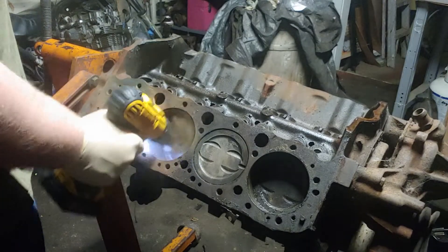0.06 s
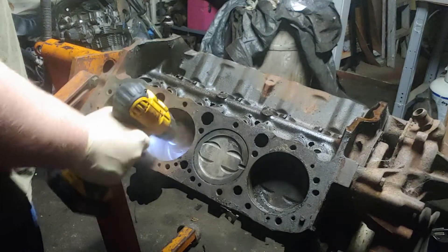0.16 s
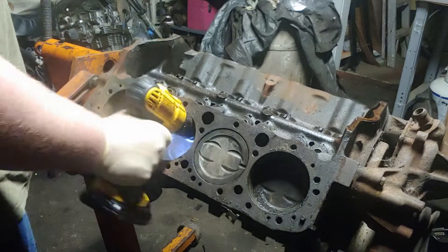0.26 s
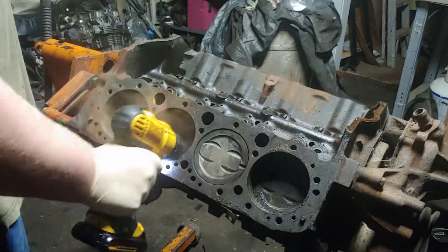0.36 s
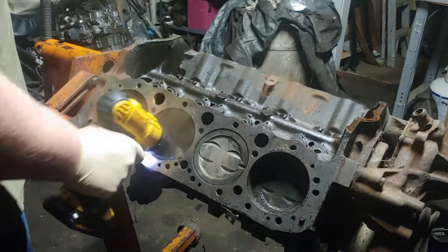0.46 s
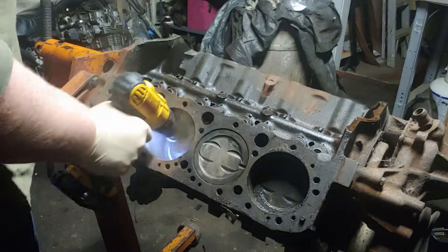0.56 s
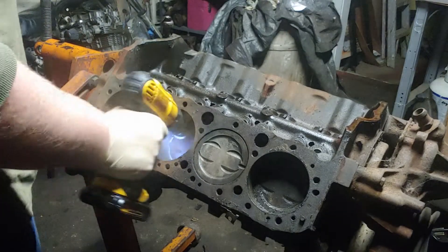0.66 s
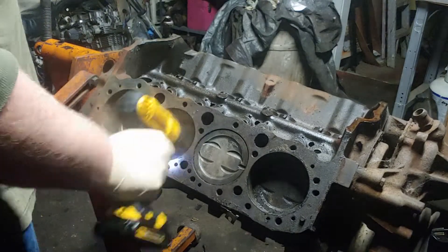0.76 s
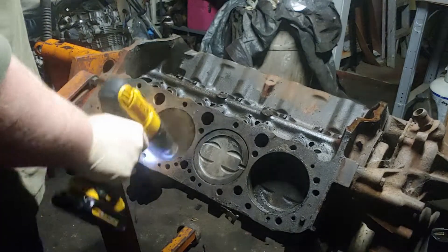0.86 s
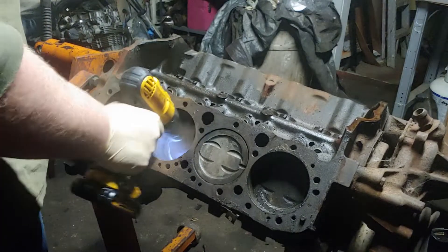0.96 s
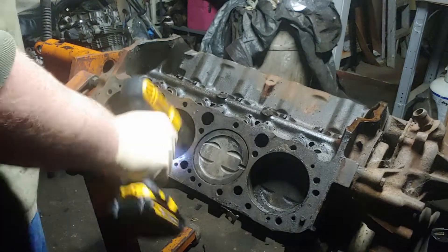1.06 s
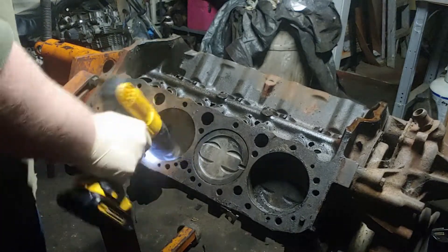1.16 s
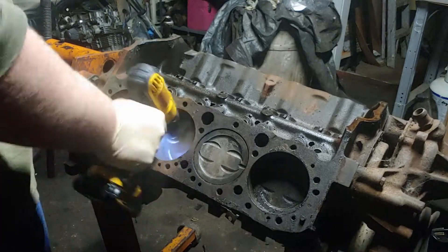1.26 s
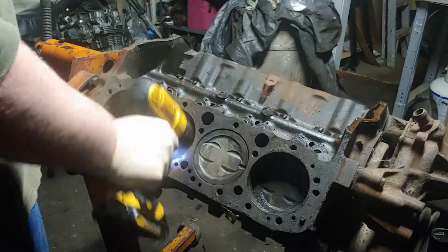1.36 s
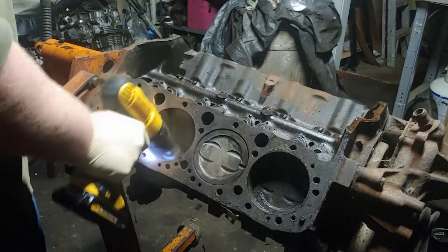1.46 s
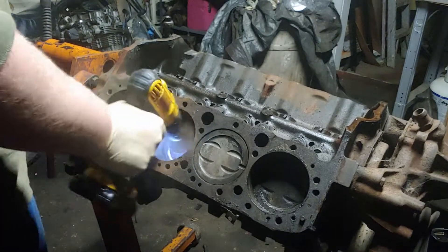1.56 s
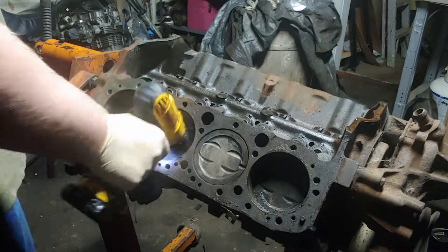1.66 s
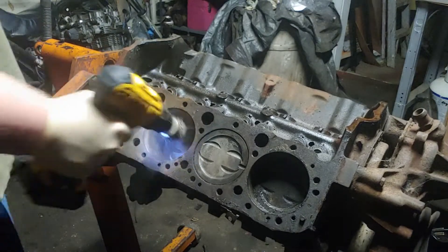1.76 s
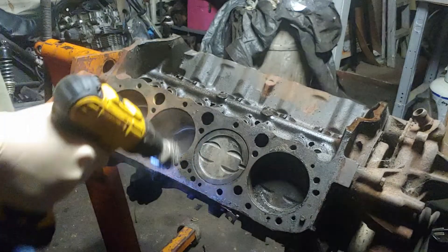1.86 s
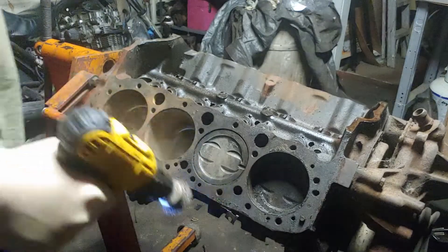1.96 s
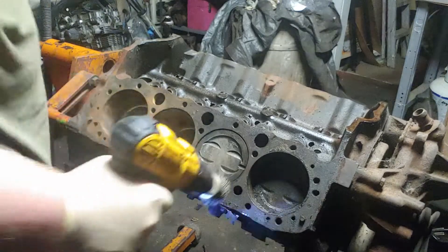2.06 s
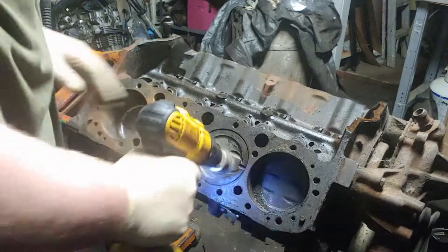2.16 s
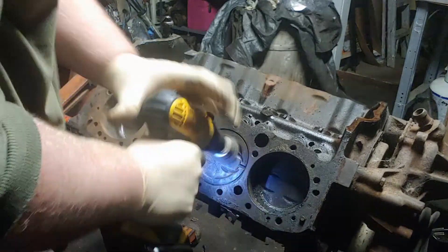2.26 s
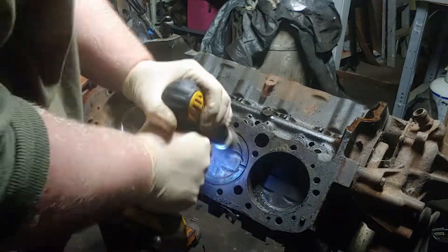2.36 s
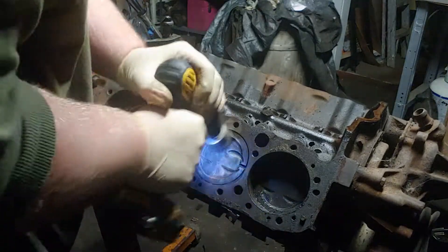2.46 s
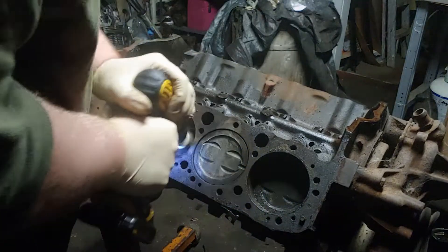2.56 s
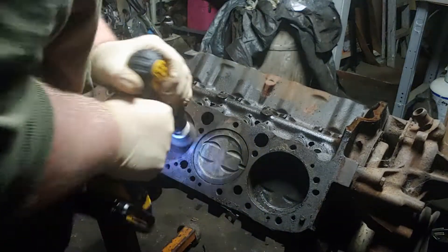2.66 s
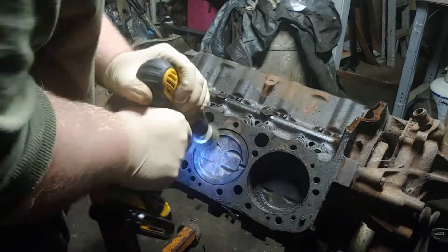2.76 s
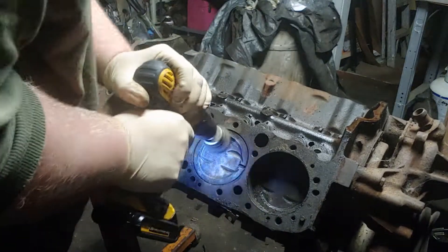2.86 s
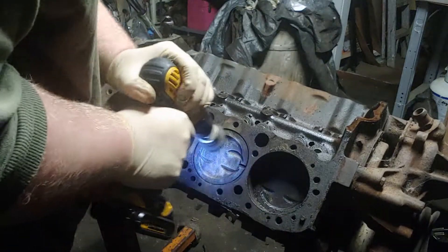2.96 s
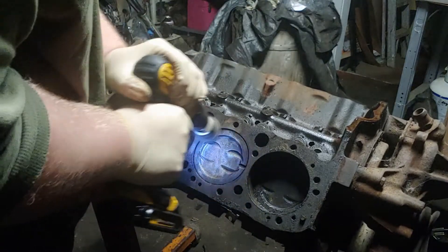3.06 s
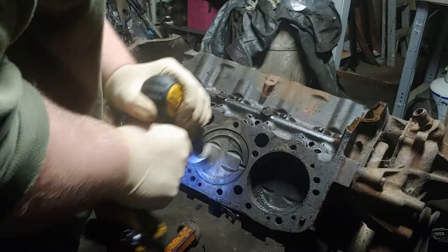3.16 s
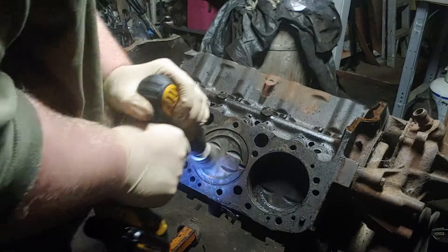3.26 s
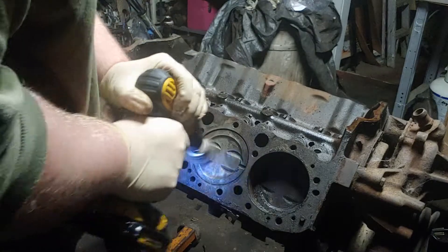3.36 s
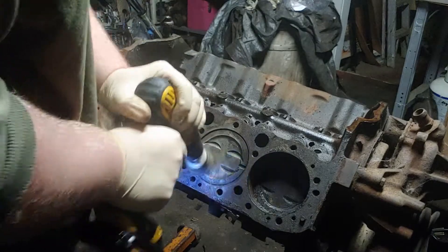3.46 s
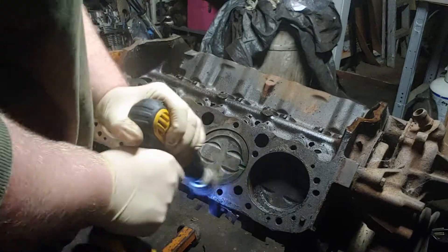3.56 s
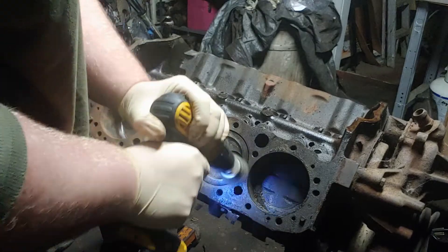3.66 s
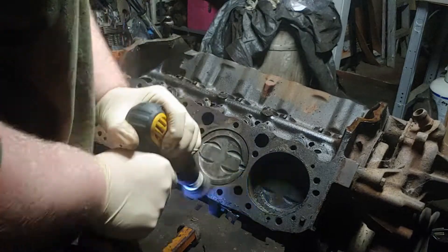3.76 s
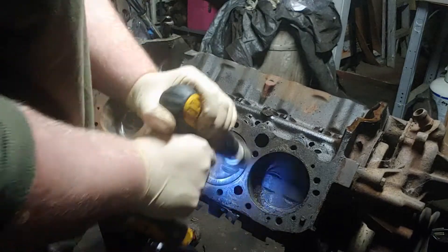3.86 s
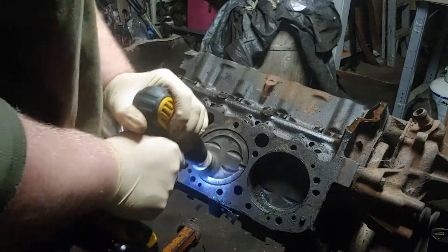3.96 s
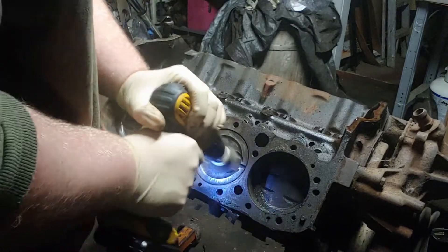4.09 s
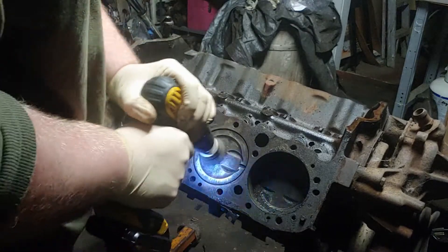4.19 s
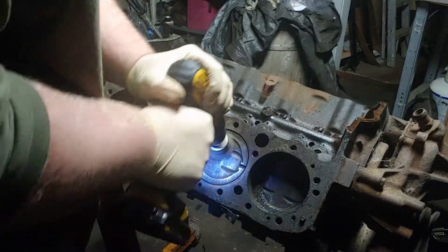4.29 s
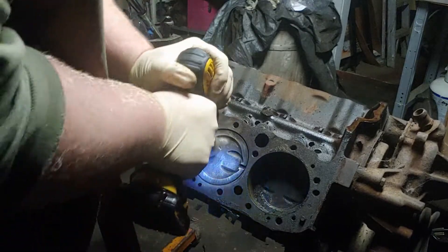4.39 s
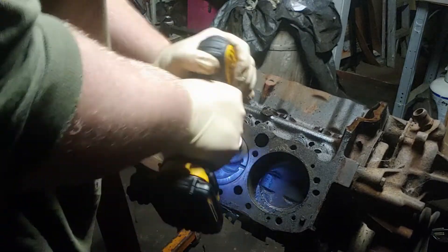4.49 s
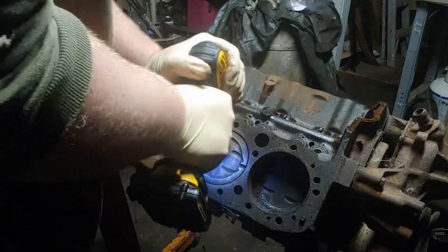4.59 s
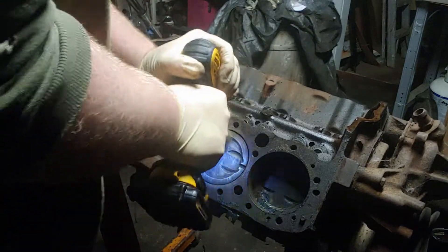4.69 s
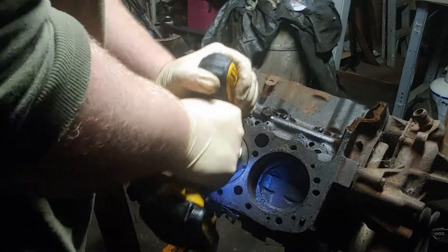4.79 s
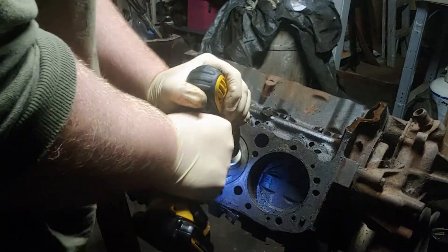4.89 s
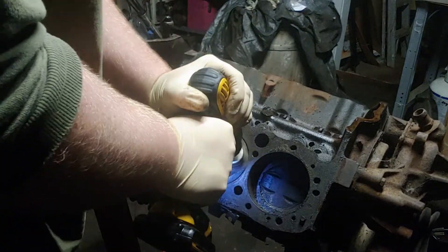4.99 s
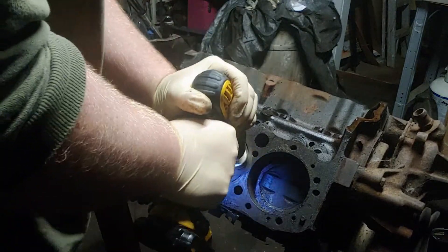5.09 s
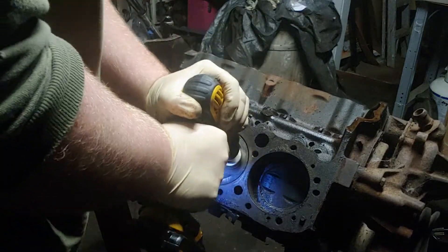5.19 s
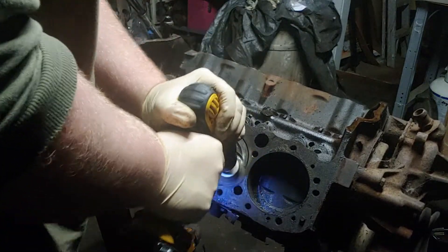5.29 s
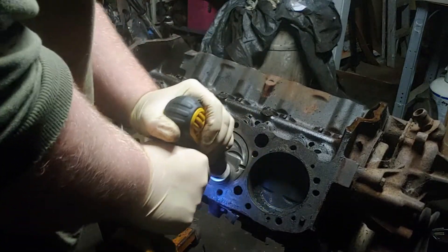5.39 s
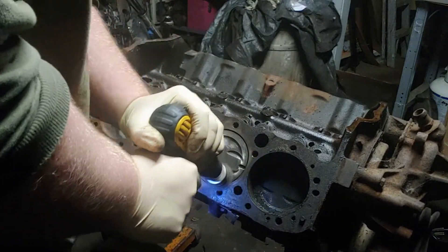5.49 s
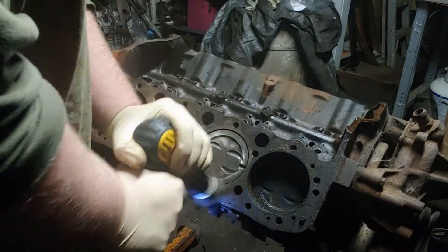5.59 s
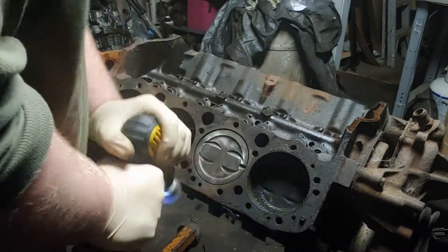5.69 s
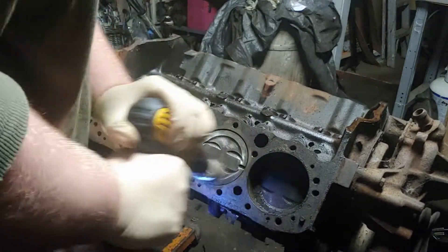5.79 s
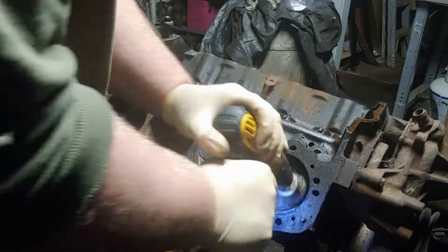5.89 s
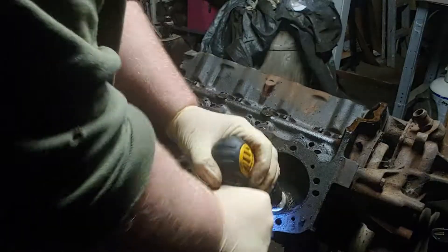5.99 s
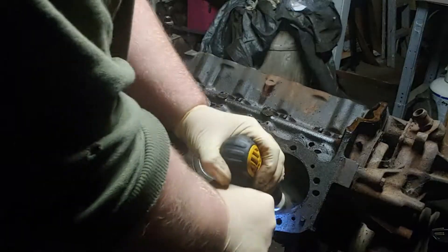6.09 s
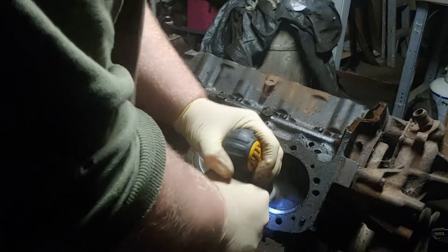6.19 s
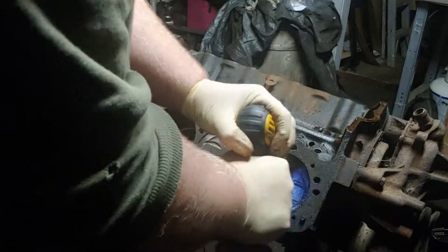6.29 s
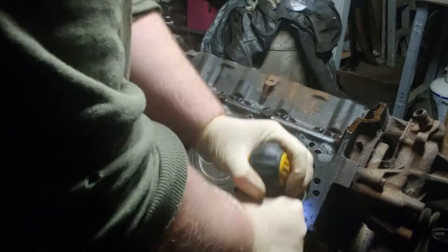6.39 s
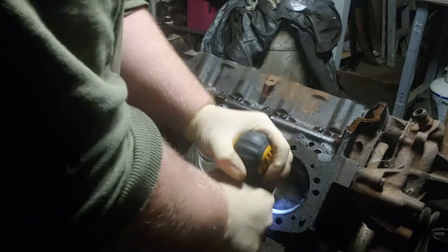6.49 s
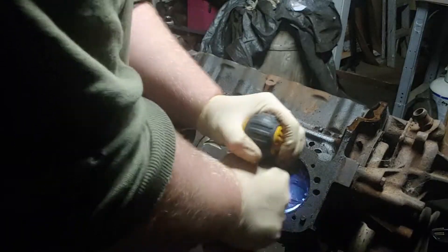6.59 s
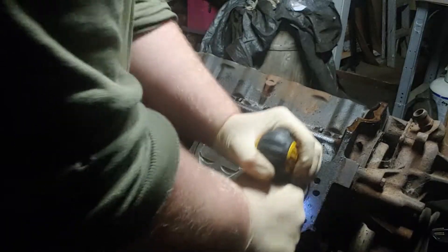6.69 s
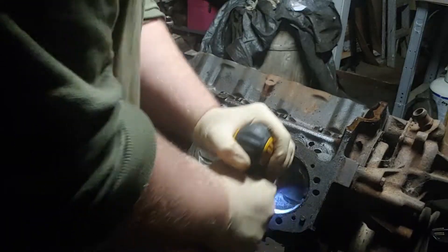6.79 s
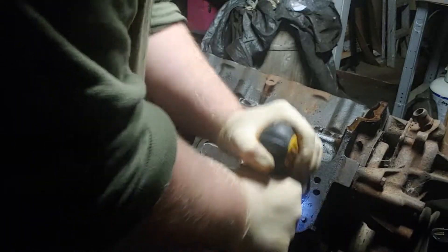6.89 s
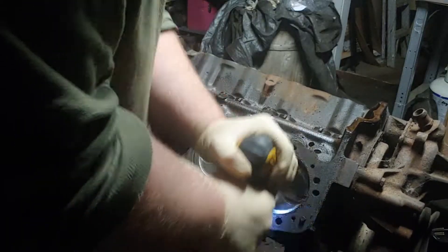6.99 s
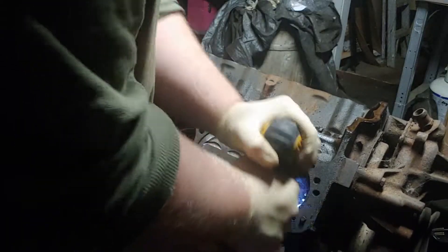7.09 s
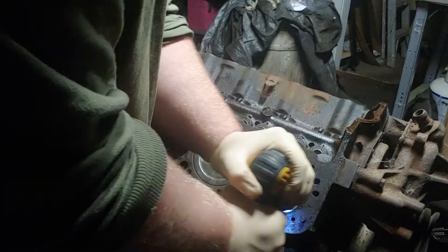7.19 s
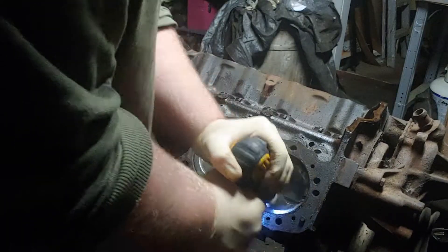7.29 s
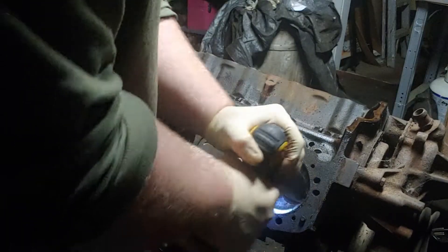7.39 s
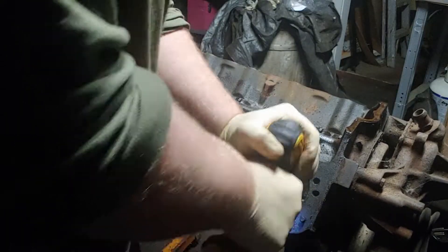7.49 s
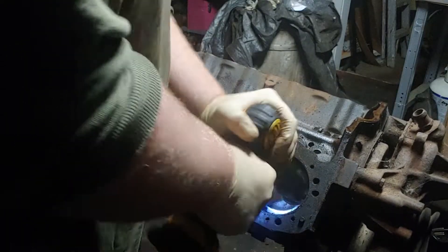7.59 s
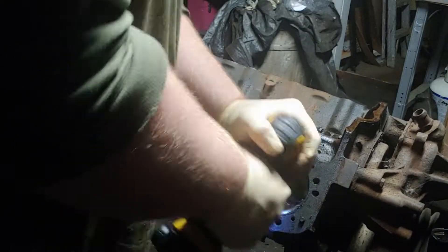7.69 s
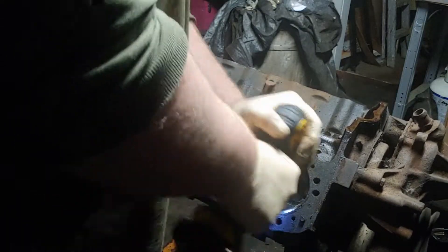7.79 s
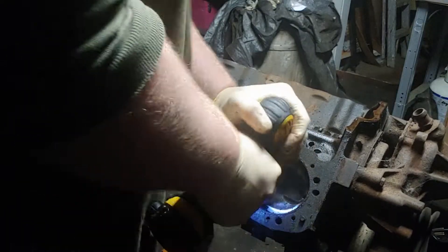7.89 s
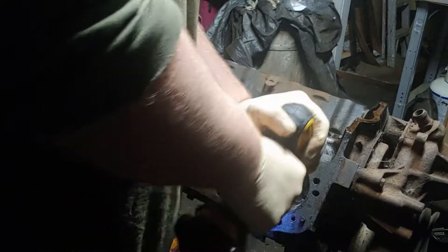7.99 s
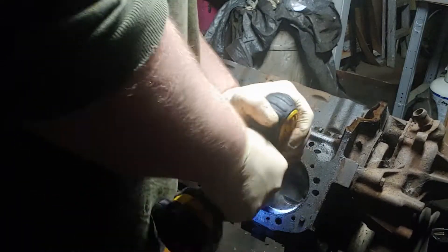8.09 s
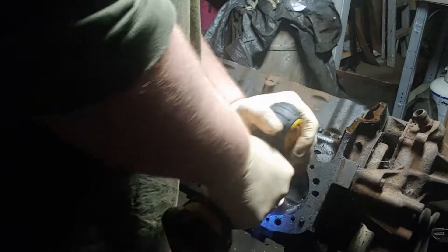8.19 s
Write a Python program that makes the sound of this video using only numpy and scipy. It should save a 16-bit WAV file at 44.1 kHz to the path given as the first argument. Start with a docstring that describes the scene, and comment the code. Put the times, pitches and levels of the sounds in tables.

```python
"""A cordless drill spins a wire brush on the pistons of an engine block in a garage: sines on multiples
of the motor rate, ticking bristles and a hiss of cooling air. At 1.7 s the spindle lock clacks and halts it;
a soft rub and knocks follow, and it runs again from 2.2 s with load sagging its speed. It stops with a clack
at 5.8 s, rubs softly, and runs from 6.0 s to the end. The drill moves across two microphone ports all along,
over echoes, room noise, a far hum and a lumpy rumble."""
import sys
import numpy as np
from scipy import signal
from scipy.fft import rfft, irfft
from scipy.io import wavfile
from scipy.ndimage import uniform_filter1d, map_coordinates

SR = 44100
rng = np.random.default_rng(int(sys.argv[2]) if len(sys.argv) > 2 else 0)


def pcm_store(signal):
    """Save signal as 16-bit PCM."""
    levels = np.round(np.clip(np.atleast_2d(signal), -1, 1) * 32767)
    wavfile.write(sys.argv[1], SR, levels.astype(np.int16).T)


N = 363809
T = np.arange(N) / SR
FULL_HZ = 740  # pulse rate at which the level tables hold

# trigger and lock: (pulled [s], brush bites [s], let go [s], spindle lock halts the motor [s])
TRIGGER = [(-1, -1, 1.611, 1.728), (2.18, 2.18, 5.697, 5.792), (6.01, 6.043, 9, 9)]
# brush at work, levels ahead of the mix: (time [s], scrape level [dB], depth in the bore as low-end boost [dB],
# cooling air level [dB], bore ring frequency [Hz], bore ring boost [dB])
WORK = [(0, -24.3, 2, -25.5, 3500, 8), (.35, -24, 3, -27, 3400, 5.5), (1.14, -26, 3, -27.5, 3400, 5.5),
        (1.7, -25, 3.5, -27.5, 3600, 5), (2.3, -23, -.5, -26, 3800, 6), (2.46, -25.5, 1, -27.5, 4000, 3),
        (3, -24.8, 0, -27.5, 3900, 0), (4, -24.3, 2, -25.5, 3900, 1), (4.6, -24.3, 2.5, -24.5, 4000, 1),
        (5.63, -25, 2, -26.5, 3950, 3.5), (5.78, -27, 1, -28, 3950, 5), (6.05, -22.5, 0, -24, 3900, -1),
        (6.12, -24.5, 1, -29, 3750, -2), (6.5, -24.5, 1, -25.5, 3750, -1), (6.9, -24, .5, -25, 3900, 0),
        (7.25, -23.7, .5, -25, 3830, 1.5), (7.55, -26, 3, -26, 3850, 3.5), (8.25, -24, 4, -26.5, 3720, 3)]


def gain_of(db):
    """Amplitude factor of a level in dB."""
    return 10 ** (np.asarray(db) / 20)


def evened(x):
    """Scales to rms 1."""
    return x / np.sqrt(np.mean(x ** 2) + 1e-20)


def read(points, hz):
    """Interpolates (Hz, dB) points over log frequency."""
    f, value = np.transpose(points)
    return np.interp(np.log(hz + 1), np.log(f + 1), value)


def columns(rows, t):
    """Interpolates each column of a timed table at t."""
    s, *values = np.transpose(rows)
    return [np.interp(t, s, v) for v in values]


def coloured(x, points):
    """Filters by a gain curve of (Hz, dB) points, without phase shift."""
    hz = np.fft.rfftfreq(x.shape[-1], 1 / SR)
    return irfft(rfft(x) * gain_of(read(points, hz)), x.shape[-1])


def slow(rate_hz):
    """Low-passed noise of rms 1: a random drift."""
    lowpass = signal.butter(2, rate_hz, fs=SR, output="sos")
    return evened(signal.sosfilt(lowpass, rng.standard_normal(N)))


def shaped(x, points, extra_db, uneven_db):
    """Colours x, then adds a changing colour and random level drifts over time and frequency; rms 1."""
    hz, t, z = signal.stft(coloured(x, points), SR, nperseg=512, noverlap=384)
    hz = hz[:, None]
    drift = rng.standard_normal((len(t), len(hz))).T
    drift = uniform_filter1d(drift, size=4, axis=0)
    drift = np.minimum(evened(uniform_filter1d(drift, size=24, axis=1)), 1.5)
    depth_db = uneven_db * (1 + 4.5 / (1 + (hz / 650) ** 6))  # levels vary more below about 650 Hz
    z = z * gain_of(extra_db(hz, t) + depth_db * drift)
    return evened(signal.istft(z, SR, nperseg=512, noverlap=384)[1][:N])


def speed(spin_up_s=.049, spin_up_bend=1.35, coast_s=.31, ease_s=.03):
    """The loaded pulse rate in Hz, reached quickly after the pull and lost slowly after letting go."""
    # trigger held, sagging as the brush is pressed: (time [s], motor pulse rate [Hz])
    loaded = [(0, 745), (.05, 731), (.11, 759), (.16, 732), (.215, 775), (.254, 736), (.29, 746),
              (.42, 717), (.484, 740), (.524, 733), (.57, 745), (.614, 733), (.654, 747), (.688, 732),
              (.878, 725), (1.01, 765), (1.06, 758), (1.09, 728), (1.15, 710), (1.23, 736), (1.33, 776),
              (1.45, 725), (1.517, 713), (1.6, 756), (2.36, 768), (2.52, 751), (2.77, 790), (2.8, 769),
              (2.92, 786), (3.04, 766), (3.14, 772), (3.2, 744), (3.3, 767), (3.38, 749), (3.45, 765),
              (3.53, 740), (3.65, 759), (3.79, 745), (3.87, 758), (4.03, 743), (4.13, 762), (4.215, 743),
              (4.35, 750), (4.445, 668), (4.53, 738), (4.6, 736), (4.705, 655), (4.775, 731), (4.93, 730),
              (5.01, 700), (5.07, 730), (5.13, 727), (5.23, 695), (5.32, 737), (5.63, 738), (5.68, 772),
              (6.1, 690), (6.24, 716), (6.37, 710), (6.465, 658), (6.59, 698), (6.69, 650), (6.84, 702),
              (6.97, 642), (7.07, 675), (7.15, 670), (7.205, 624), (7.42, 718), (7.78, 720), (7.84, 733),
              (8.01, 720), (8.17, 738), (8.25, 710)]
    spin = 0
    for pull, _, off, lock in TRIGGER:
        rise = 1 - np.exp(-(np.maximum(T - pull, 0) / spin_up_s) ** spin_up_bend)
        coast = np.exp(-np.maximum(T - off, 0) / coast_s)
        spin = spin + (T >= pull) * (T < lock + .1) * rise * coast
    return uniform_filter1d(columns(loaded, T)[0], size=round(ease_s * SR)) * spin


def locked():
    """1 from each lock to the next pull of the trigger."""
    turning = sum((T >= pull) & (T < lock) for pull, _, _, lock in TRIGGER)
    return 1 - uniform_filter1d(turning * 1., size=90)


def running(shudder_db_per_s=-600, shudder_s=.03):
    """1 while the brush turns freely, then a short fading shudder after the lock."""
    on = 0
    for _, bite, _, lock in TRIGGER:
        fade = gain_of(shudder_db_per_s * np.maximum(T - lock, 0))
        on = on + ((T >= bite) & (T < lock + shudder_s)) * fade
    return uniform_filter1d(on, size=300)


def motor(hz, waver_db=1.5, jitter=0.0016, speed_power=3):
    """Sines on multiples of the pulse rate, each wavering a little and fading as the motor slows."""
    # rms levels at FULL_HZ, ahead of the waver:
    # (time [s], whine [dB], throb [dB], gear mesh [dB], top whistle [dB])
    tones = [(0, -29, -56, -56, -39), (.5, -27, -54, -61, -36), (.9, -27, -56, -60, -41),
             (1.2, -28, -48, -52, -46), (1.7, -29, -52, -60, -46), (2.25, -28, -45, -50, -46),
             (2.9, -28, -38, -45, -53), (3.5, -27.5, -40, -45.5, -44), (4.2, -26, -41.5, -45, -47),
             (4.5, -29, -44, -53, -38), (5.1, -25.5, -47, -49, -36), (5.65, -28, -43.5, -48, -47),
             (6.05, -40, -50, -56, -50), (6.2, -28, -47, -52, -40), (6.4, -28, -52, -45, -38),
             (6.8, -29, -50, -46, -40), (7, -28, -52, -40, -46), (7.35, -26.5, -47, -40, -39),
             (7.65, -30, -46.5, -42, -37), (7.95, -29, -45, -48, -31), (8.25, -28, -48, -52, -39)]
    # multiples of the pulse rate: (whine [1], throb [1], gear mesh [1], top whistle [1])
    tone_orders = (12, 1, 2.75, 20)
    # fainter tones: (multiple of the pulse rate [1], level re whine in run 1 [dB], run 2 [dB], run 3 [dB])
    faint = [(1.15, -23, -22, -21.5), (4, -19, -21.5, -32), (5, -21, -15, -12.5), (10, -16, -12.5, -10),
             (12.77, -18, -16, -9), (13.09, -23, -13, -25), (13.91, -19, -15, -33), (17, -27, -21, -22),
             (18, -28, -19, -21), (19, -17, -19, -19)]
    turns = np.cumsum(hz * (1 + jitter * slow(60))) / SR
    levels = columns(tones, T)
    run = np.searchsorted([row[0] for row in TRIGGER[1:]], T)
    orders = list(zip(tone_orders, levels))
    orders += [(k, levels[0] + np.take(db, run)) for k, *db in faint]
    orders.append((2.62, levels[2] - 4.0))  # second gear stage
    sway = [slow(16.7) for _ in range(4)]
    out = 0
    for j, (k, db) in enumerate(orders):
        level = np.sqrt(2) * gain_of(db + waver_db * sway[j % 4])
        out = out + level * np.sin(2 * np.pi * (k * turns + rng.random()))
    return (1 - locked()) * running() * (hz / FULL_HZ) ** speed_power * out


def brush(motor_hz, tips_per_s=9000, spread_db=2.5, hiss=.8, ring_width_hz=320, wobble_db=0.53,
          speed_power=.75, shudder_low_db=9):
    """Wire tips tick on the metal in thousands; the bore adds a ring and, deeper in, more low end."""
    # scrape colour: (frequency [Hz], relative level [dB])
    scrape = [(120, -55), (200, -45), (366, -30), (538, -19), (615, -30), (715, -12.5), (804, -12.5),
              (1030, -9.5), (1990, -4), (2390, -3), (3960, 0.5), (6220, -1), (11000, -9.5), (14300, -25),
              (22000, -120)]
    # narrow rings of the cast iron: (frequency [Hz], full width [Hz], boost [dB])
    block = [(549, 17, 9), (944, 20, 6.5), (2150, 43, 1.5)]
    hits = rng.random(N) < tips_per_s / SR
    strength = gain_of(spread_db * np.minimum(rng.exponential(1, N), 6.))
    tips = hits * strength * rng.choice([-1, 1], N)
    drive = evened(tips) + hiss * rng.standard_normal(N)
    all_hz = np.fft.rfftfreq(N, 1 / SR)
    iron_db = sum(db / (1 + (2 * (all_hz - f) / w) ** 2) for f, w, db in block)
    drive = irfft(rfft(drive) * gain_of(iron_db), N)

    def bore(hz, t):
        """Low-end boost and ring in dB; the shudder after a lock is duller."""
        _, depth_db, _, ring_hz, ring_db = columns(WORK, t)
        depth_db = depth_db + shudder_low_db * np.interp(t, T, locked() * running())
        low = 1 / (1 + (hz / 2200) ** 4) + 1.4 / (1 + (hz / 500) ** 4)
        return depth_db * low + ring_db * np.exp(-((hz - ring_hz) / ring_width_hz) ** 2)

    level = running() * (motor_hz / FULL_HZ) ** speed_power
    return level * shaped(drive, scrape, bore, 0.77) * gain_of(columns(WORK, T)[0] + wobble_db * slow(5.9))


def cooling_air(motor_hz, flutter_db=0.3, speed_power=2.6):
    """The fan blows through the vents as a high, fluttering hiss."""
    # hiss colour: (frequency [Hz], relative level [dB])
    air = [(4710, -27), (8000, -0.5), (10300, 5.5), (12600, -0.5), (14200, 6), (15000, -0.5),
           (15700, -12.5), (16100, -24)]
    hiss = shaped(rng.standard_normal(N), air, lambda hz, t: 0 * hz, 1.6)
    level = (1 - locked()) * running() * (motor_hz / FULL_HZ) ** speed_power
    return level * hiss * gain_of(columns(WORK, T)[2] + flutter_db * slow(150))


def clicks():
    """Lock, trigger and brush knocks: short noise bursts through the resonances of the housing."""
    # (time [s], peak ahead of the ports [dB], boost below 1 kHz [dB], boost above 6 kHz [dB],
    # decay constant of the burst [ms])
    events = [(0.744, -20, -23, -2, 1.09), (1.7205, -14, -18, -22, .6), (1.7283, -5, -20, -13, 1.7),
              (1.7287, -10, -18, -7, 0.82), (1.7342, -27, -20, -2, .6), (1.746, -23, -20, -15, 1.5),
              (1.898, -29, 8, -14, 1.2), (1.9805, -44, 12, -19, 1.68), (2.153, -42, -11, -2, 1.2),
              (2.181, -20, -15, -21, .8), (2.3066, -23, -14, -16, 1.3), (2.339, -10, -23, -4, 0.86),
              (2.6038, -12, -20, -9, 1.5), (5.7915, -2.5, -15, -9, 1), (5.7943, -9, -26, -23, 1.4),
              (5.807, -14, -20, -20, 0.95), (6.008, -38, -15, -24, 2.6)]
    # resonances: (frequency [Hz], half width at half gain [Hz], relative level [dB])
    housing = [(600, 400, -18), (1463, 500, 8), (3740, 1000, 8), (5447, 780, 0), (8140, 2060, 16),
               (9740, 4100, 3), (13700, 2000, -6)]
    t, hz = np.arange(1024) / SR, np.fft.rfftfreq(1024, 1 / SR)
    out = np.zeros(N + 1024)
    noises = rng.standard_normal((len(events), 1024))
    for (s, peak_db, thud_db, bright_db, ms), noise in zip(events, noises):
        body = 0
        for f, w, db in housing:
            level = gain_of(db + thud_db * (f < 1000) + bright_db * (f > 6000))
            body = body + level * (w / (w + 1j * (hz - f)) * hz / (hz + 0.54 * f)) ** 2
        click = irfft(rfft(noise * np.exp(-t * 1000 / max(ms, .2))) * body)
        out[round(s * SR):][:1024] += gain_of(peak_db) * click / abs(click).max()
    return out[:N]


def rustle():
    """Something rubs softly as the drill is carried over: dull band-passed noise that rises and fades."""
    # (start [s], rise [s], level at the end of the rise [dB], fade [dB/s])
    rubs = [(1.899, .001, -40, -420), (1.96, .03, -53, -150), (5.92, .09, -48, -700)]
    band = signal.butter(4, [400, 6200], "bandpass", fs=SR, output="sos")
    noise = evened(signal.sosfilt(band, rng.standard_normal(N)))
    level = 0
    for s, rise, db, fade_db in rubs:
        fade = gain_of(db + fade_db * np.maximum(T - s - rise, 0))
        level = level + np.clip((T - s) / rise, 0, 1) ** 2 * fade
    return noise * level


def ports(x, lag_us, pan_db):
    """Two ports: half the lag is taken from the left and added to the right; pan_db is left re right."""
    shift = lag_us * SR / 2e6  # samples per port
    pair = [map_coordinates(x, [np.arange(N) + side * shift], order=5, mode="nearest") for side in (1, -1)]
    return np.array(pair) * gain_of([pan_db / 2, -pan_db / 2])


def reflections(x, t60=0.14, late_db=-28, late_t60=0.5, size=1024):
    """Block, hands and walls send back sparse echoes; they differ per port and change frame by frame."""
    # echo colour: (frequency [Hz], relative gain [dB])
    diffuse = [(100, -22), (700, 0.5), (2800, -2), (6000, 2), (10000, 1), (15000, 3.5)]
    t, out = np.arange(10 * size) / SR, np.zeros((2, N + 14 * size))
    fade = (gain_of(-60 * t / t60) + gain_of(late_db - 60 * t / late_t60)) * (t > .0015)
    padded = np.pad(x, (size, 2 * size))
    window = np.sin(np.pi * np.arange(2 * size) / (2 * size))
    for at in range(0, N + size, size):
        chance = rng.random((2, len(t)))
        tail = ((chance < .05) * 1. - (chance > .95)) * fade
        tail /= np.linalg.norm(tail, axis=1, keepdims=True)
        echo = signal.fftconvolve((padded[at:at + 2 * size] * window)[None], tail, axes=1)
        out[:, at:at + echo.shape[1]] += echo
    return coloured(out[:, size:size + N], diffuse)


def garage(room_db=-55.5, rumble_floor_db=-72):
    """Uneven, drifting room noise, partly shared by the ports, a distant fuzzy hum and a lumpy rumble."""
    # room colour: (frequency [Hz], relative level [dB])
    room = [(18, -60), (30, -52), (145, -1.5), (215, -6), (310, -2), (354, -13.5), (393, -12), (842, -5),
            (960, -18), (1150, -6.5), (2170, -12), (3380, -17), (13600, -34), (15900, -52)]
    # a machine far off: (frequency [Hz], full width at half amplitude [Hz], level [dB])
    machine = [(167.4, 10, -63), (329.8, 20, -71.5)]
    # low swells, added to the floor: (middle [s], full width at 1/e [s], level ahead of the drift [dB])
    swells = [(2.6, .2, -69), (3.35, .2, -69), (4.86, 1, -65.5), (6.5, .35, -65), (7.03, .2, -65),
              (7.35, .15, -67), (7.67, .15, -68), (8.04, .15, -72)]
    a, b = (shaped(v, room, lambda hz, t: 0 * hz, 1.3) for v in rng.standard_normal((2, N)))
    hz, hum = np.fft.rfftfreq(N, 1 / SR), 0
    for f, w, db in machine:
        band = 1 / (1 + (2 * (hz - f) / w) ** 2)
        hum = hum + gain_of(db) * evened(irfft(rfft(rng.standard_normal(N)) * band, N))
    swell = gain_of(rumble_floor_db)
    for s, length, db in swells:
        swell = swell + gain_of(db) * np.exp(-(2 * (T - s) / length) ** 4)
    low = irfft(rfft(rng.standard_normal((2, N))) / (1 + ((hz - 92) / 18) ** 4), N)
    rumble = evened(low + 0.11 * low[::-1]) * swell * gain_of(2.4 * slow(4.8))
    return gain_of(room_db) * np.array([a, 0.29 * a + 1.52 * b]) + hum + rumble


def scene():
    """Drill sounds placed at the two ports, with their reflections and the garage behind."""
    # drill position: (time [s], lag of the right port for the brush [us], the same for the motor [us],
    # left re right for the brush [dB])
    place = [(0, -15, 10, -2.5), (.55, 15, 28, -3), (1.7, 8, 15, -3.5), (2.2, 24, 0, .5), (4.15, 21, -7, 1),
             (4.4, 44, 46, -.5), (5.1, 35, 65, 1), (5.6, 23, 5, .4), (6.05, 70, 41, 1.9),
             (7.2, 66, 51, 1.5), (7.45, 65, 85, 1.5), (8.25, 78, 74, -1)]
    hz = speed()
    brush_us, motor_us, pan_db = columns(place, T)
    noise = gain_of(-1.5) * (brush(hz) + cooling_air(hz))
    tones = motor(hz)
    hits = clicks() + rustle()
    direct = ports(noise + hits, brush_us, pan_db) + ports(tones, motor_us, pan_db - 5.0)
    echoes = reflections(noise + gain_of(-9) * tones + gain_of(-9) * hits)
    return direct + echoes + garage()


def record(dry, hiss_db=-61, bass_cut_hz=70, edge_hz=16090):
    """The microphone adds hiss and drops deep bass, the two ports differ in colour; then the band limit."""
    dry = dry + gain_of(hiss_db) * rng.standard_normal((2, N))
    dry = signal.sosfilt(signal.butter(2, bass_cut_hz, "highpass", fs=SR, output="sos"), dry)
    # (frequency [Hz], half the left-right difference [dB])
    tilt = [(60, -4.5), (200, 1.5), (1000, 2.0), (2500, 1.0), (6000, -1.3), (9000, 3.47), (13000, -1.5)]
    pair = np.array([coloured(dry[0], tilt), coloured(dry[1], [(f, -db) for f, db in tilt])])
    lowpass = signal.firwin(511, edge_hz, window=("kaiser", 9), fs=SR)
    return signal.oaconvolve(pair, lowpass[None], "same")


dry = scene()
out = record(dry)
pcm_store(out)
```